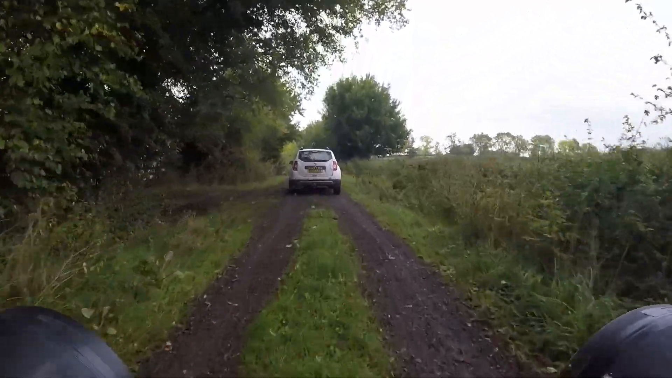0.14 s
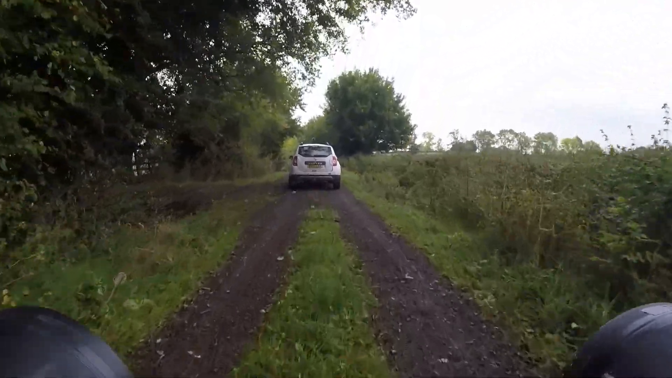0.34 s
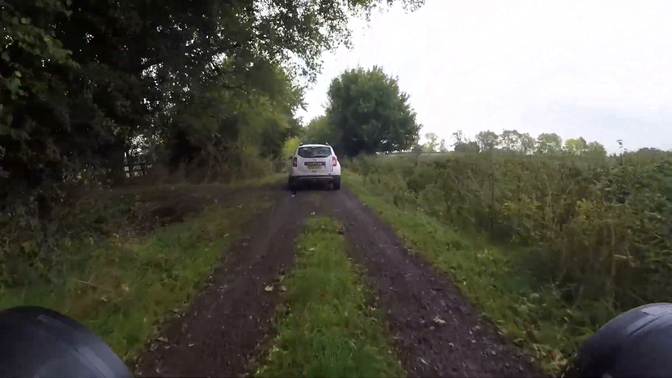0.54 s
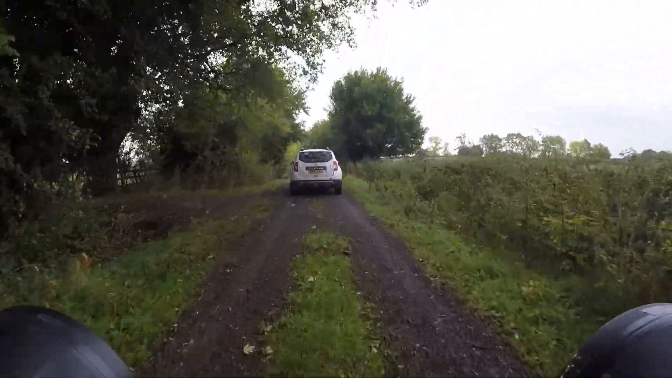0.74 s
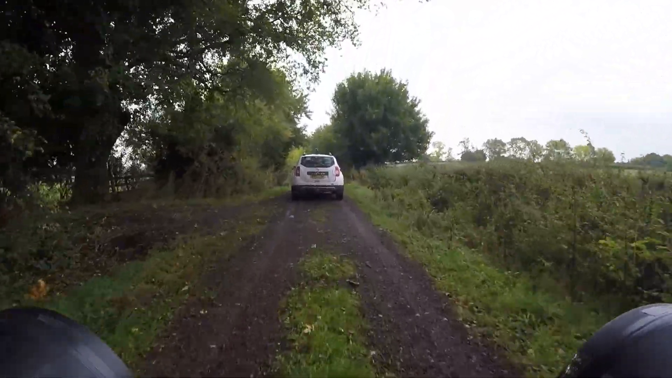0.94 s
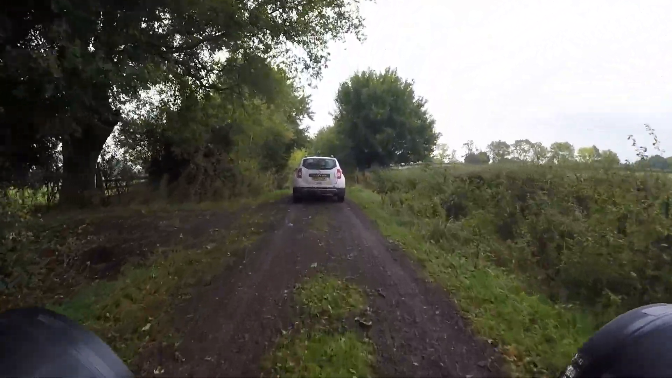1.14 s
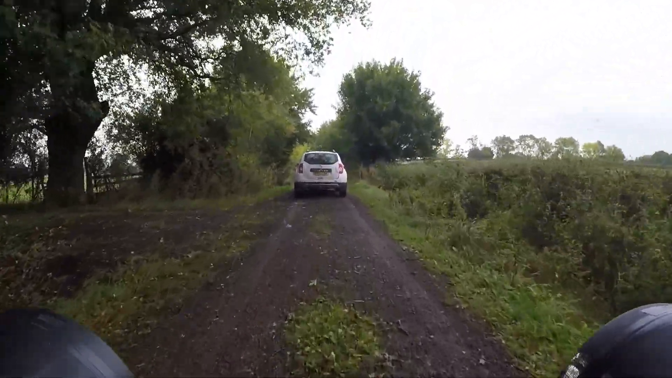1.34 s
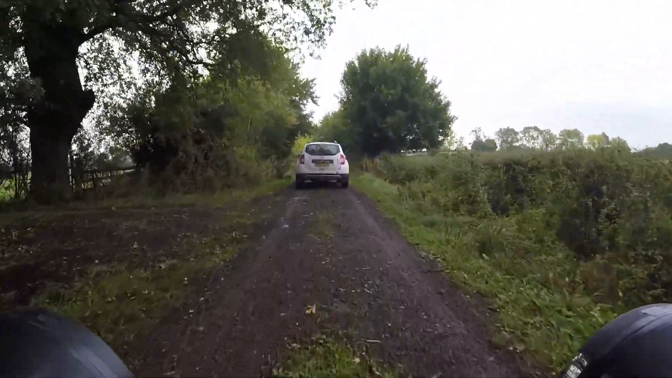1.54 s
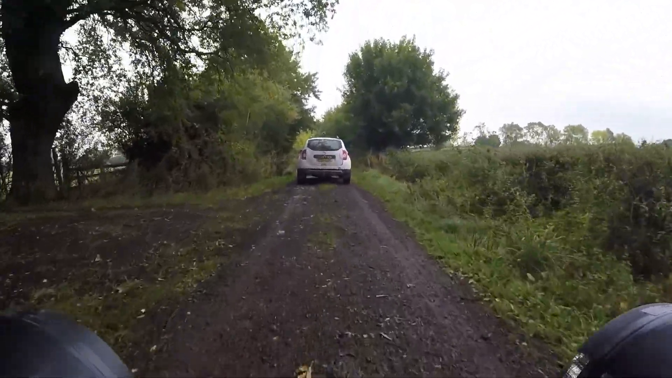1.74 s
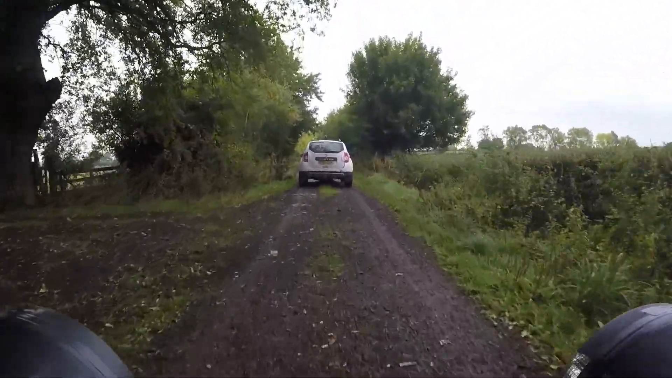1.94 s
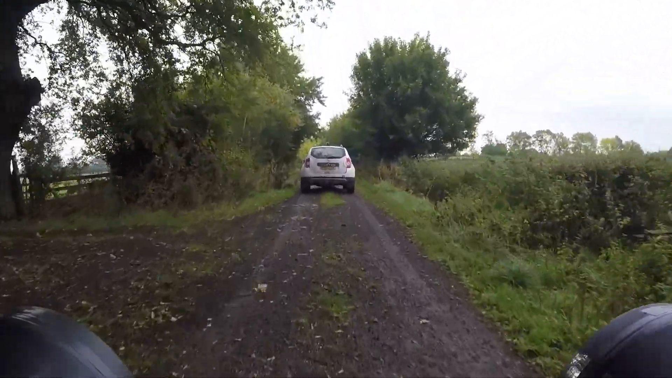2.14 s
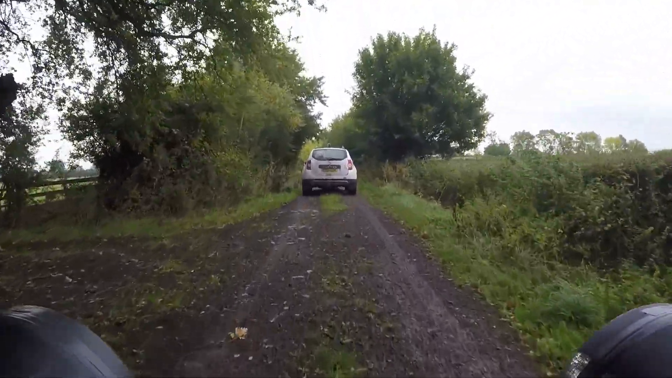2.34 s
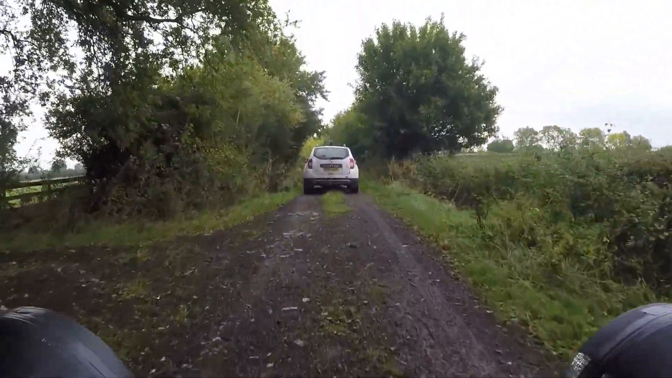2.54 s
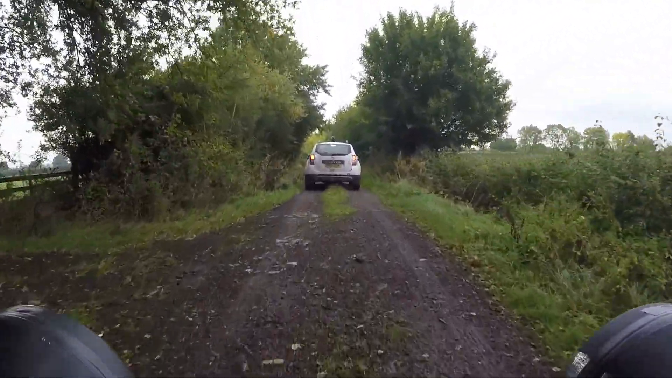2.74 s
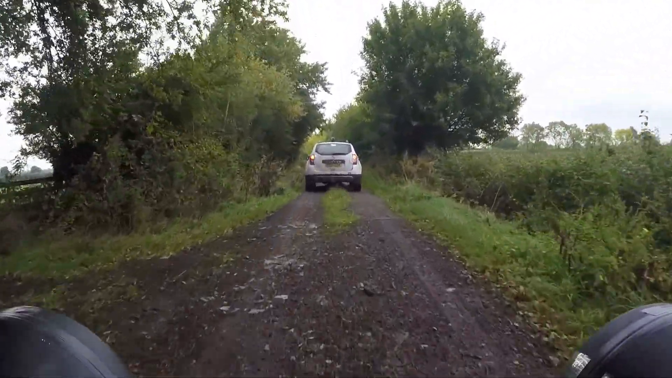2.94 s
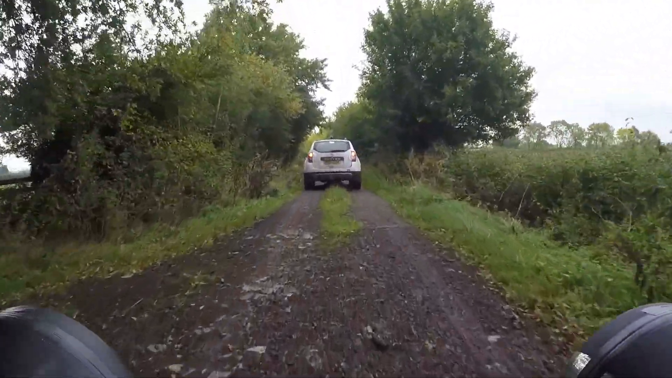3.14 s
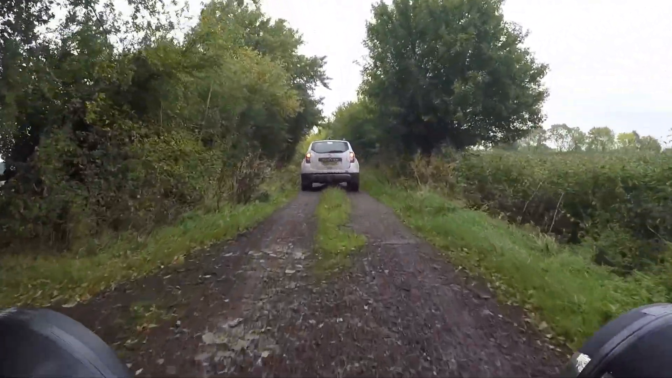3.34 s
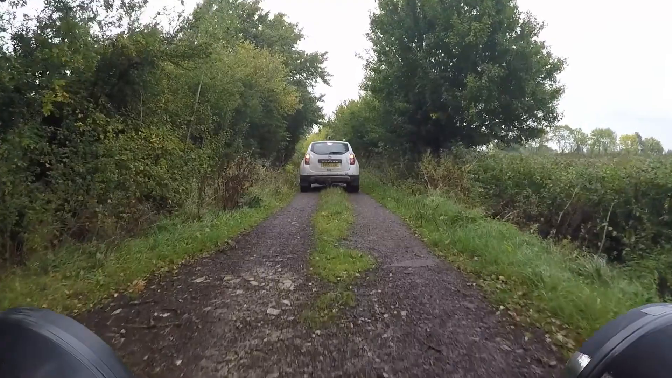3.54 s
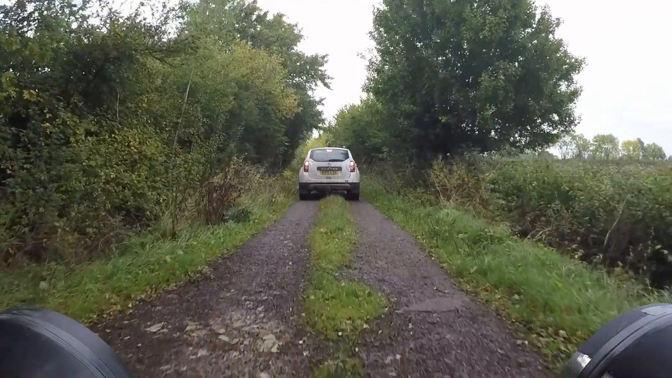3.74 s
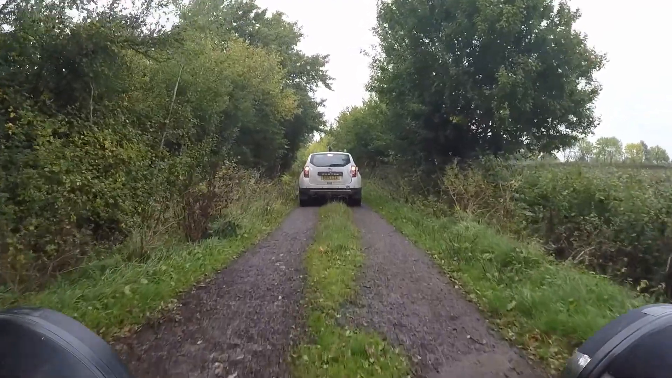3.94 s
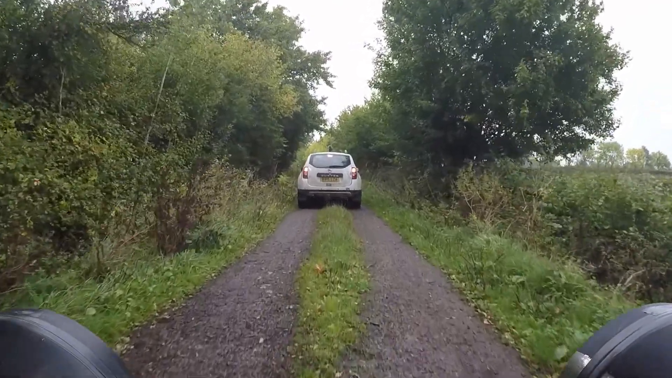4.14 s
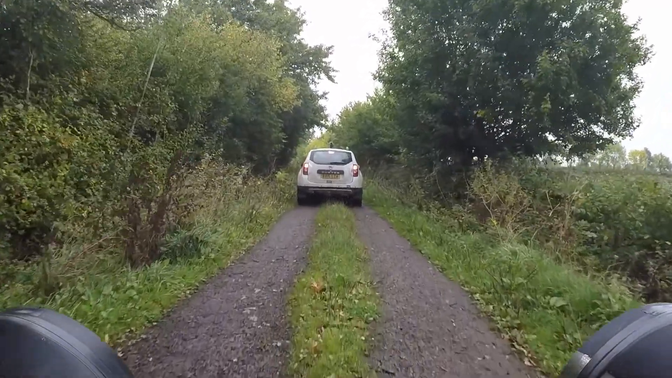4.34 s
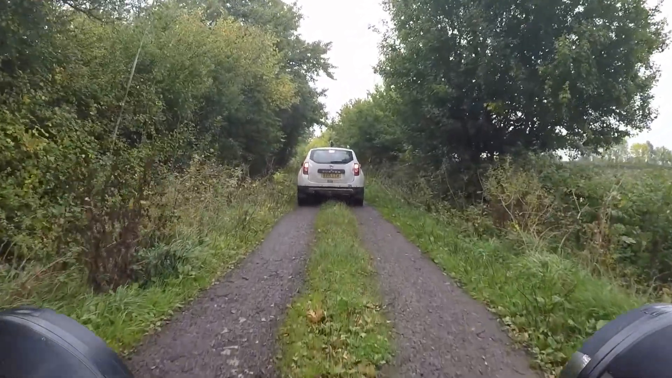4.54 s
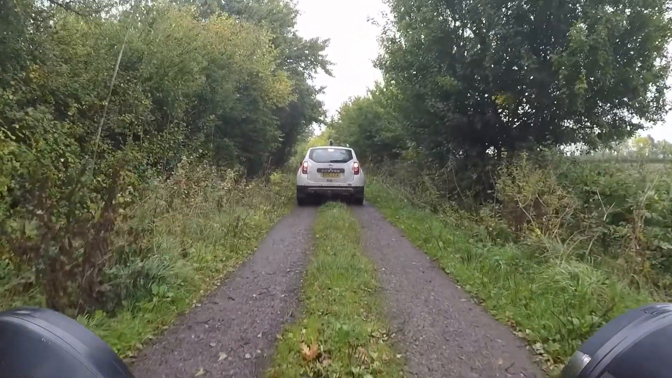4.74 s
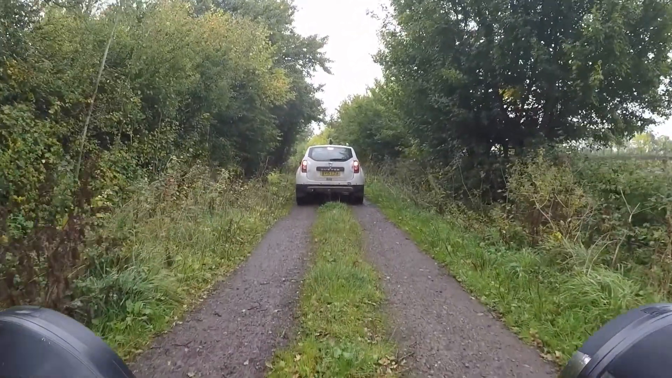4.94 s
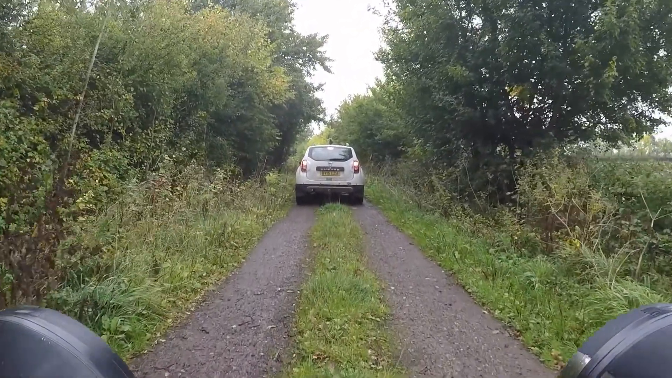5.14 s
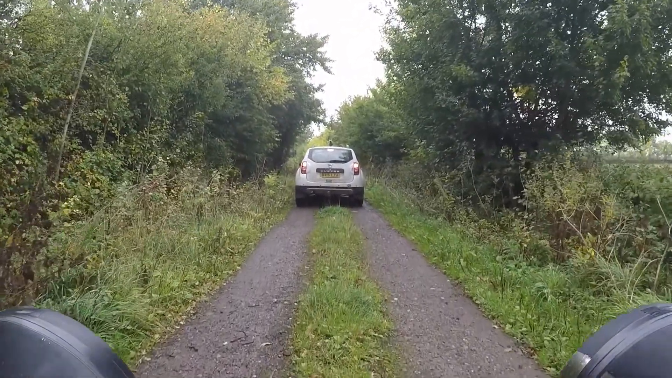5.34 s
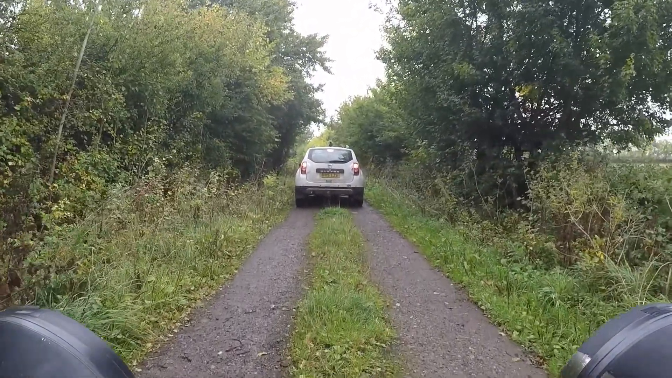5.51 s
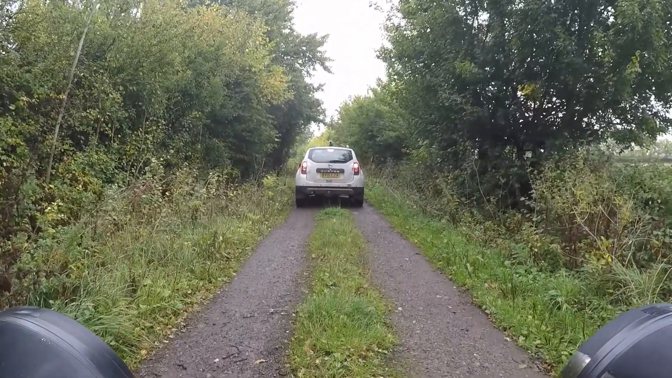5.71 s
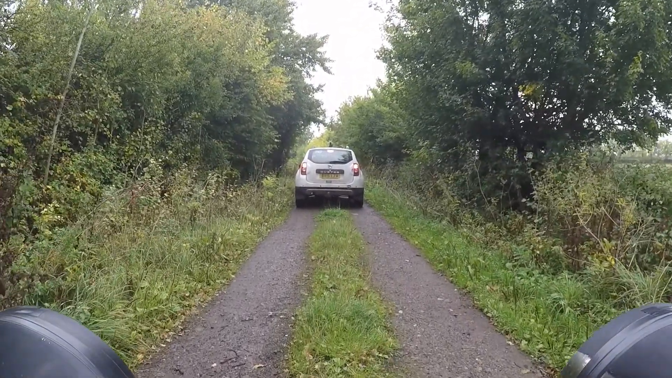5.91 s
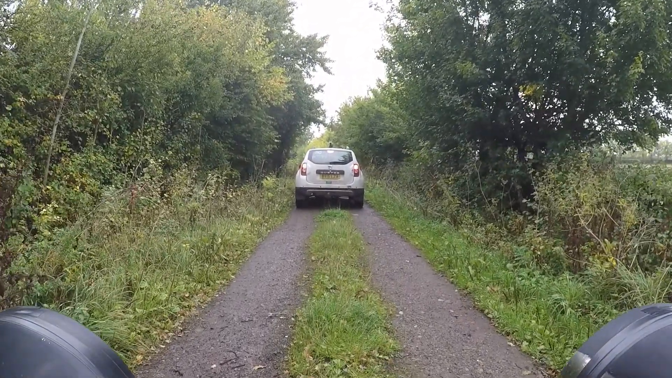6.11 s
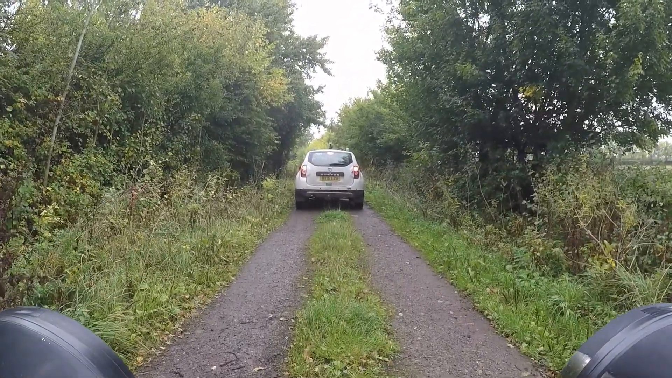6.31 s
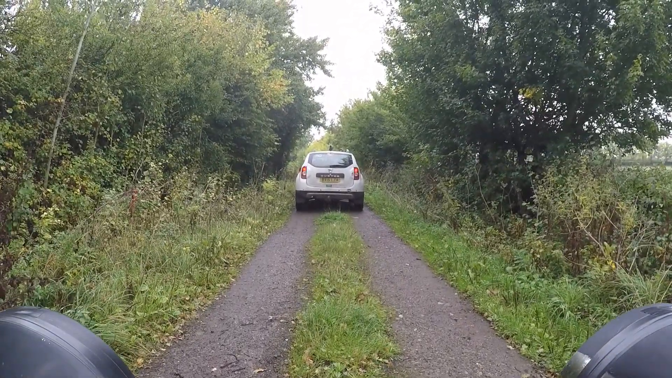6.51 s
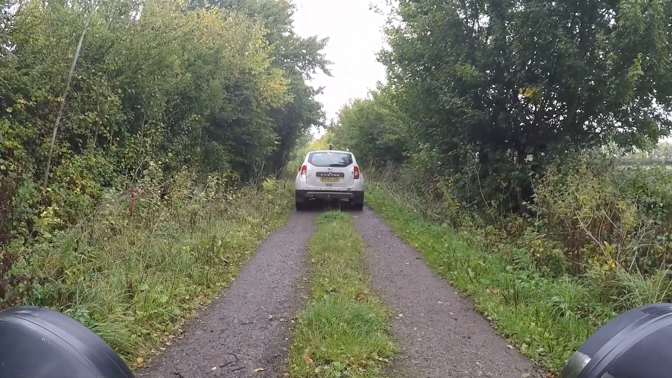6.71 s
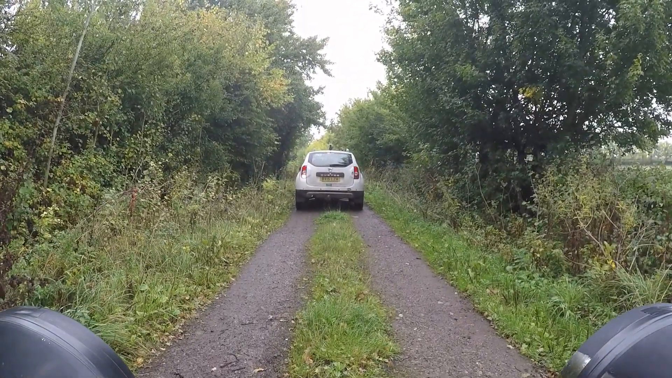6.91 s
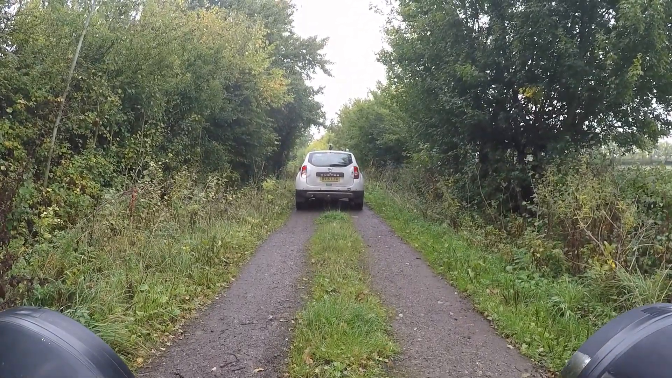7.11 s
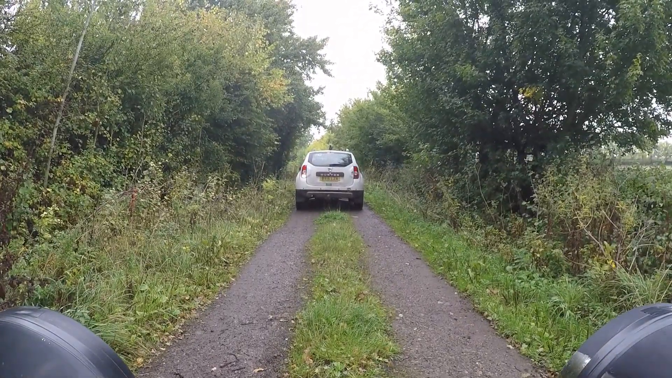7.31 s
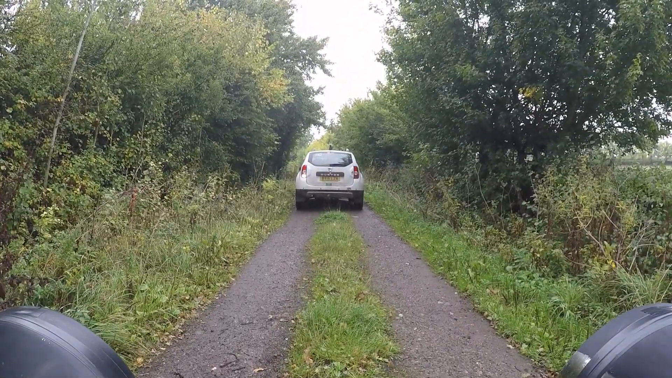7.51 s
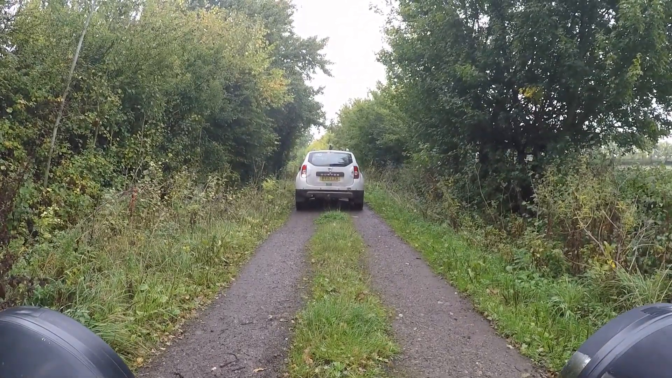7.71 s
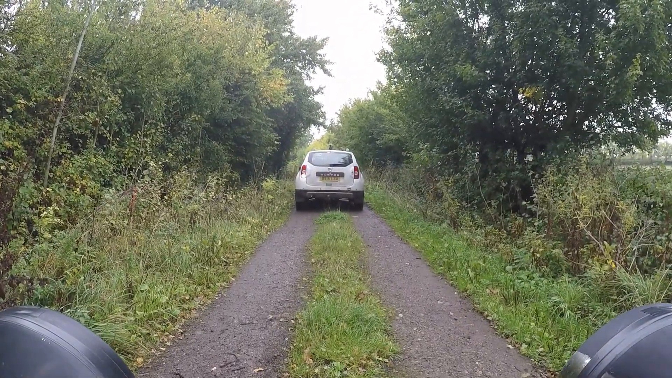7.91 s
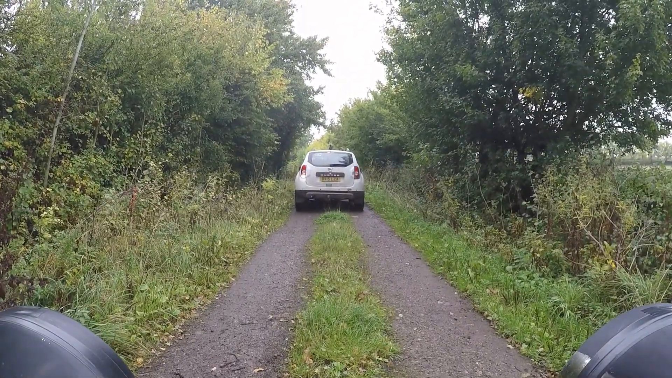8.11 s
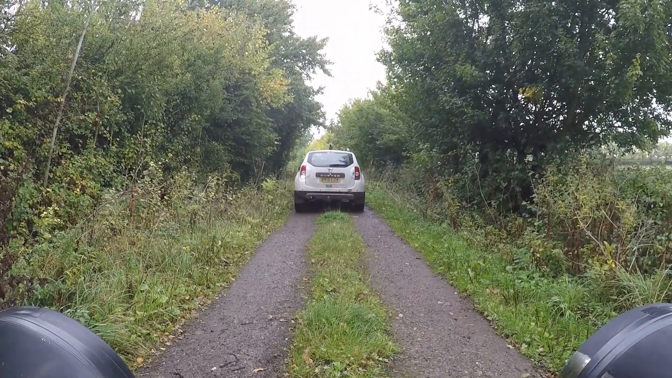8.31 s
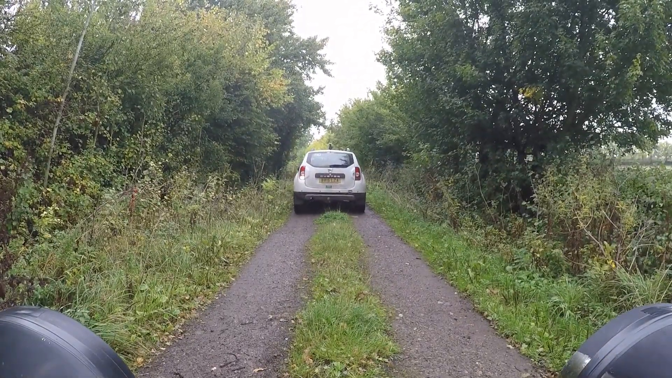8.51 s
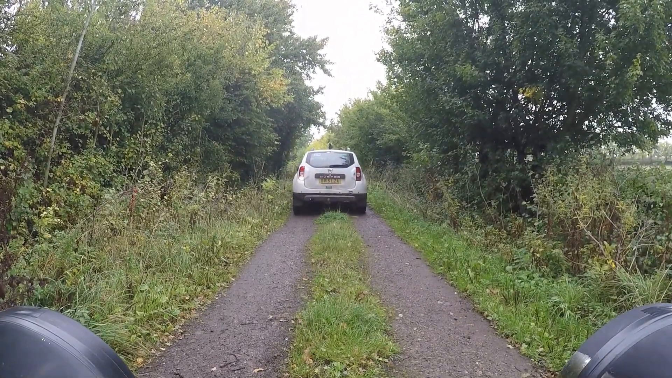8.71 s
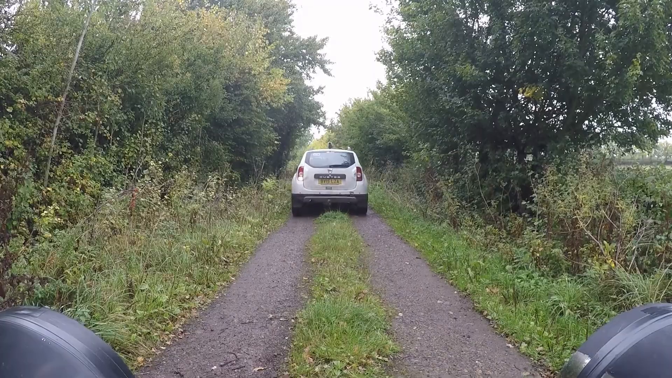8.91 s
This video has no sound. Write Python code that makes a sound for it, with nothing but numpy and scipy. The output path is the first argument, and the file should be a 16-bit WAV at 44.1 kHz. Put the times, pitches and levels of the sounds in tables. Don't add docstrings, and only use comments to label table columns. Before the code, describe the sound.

A diesel off-roader creeps along a stony track, deep booming thuds and crunching gravel easing into a clattering engine idle, with faint high brake squeals.

```python
import sys
import numpy as np
from scipy import signal
from scipy.fft import rfft, irfft, next_fast_len
from scipy.io import wavfile
from scipy.ndimage import uniform_filter1d, map_coordinates

SR = 44100
rng = np.random.default_rng(int(sys.argv[2]) if len(sys.argv) > 2 else 0)


def master_out(mix):
    frames = np.transpose(np.atleast_2d(mix))
    ceiling = np.clip(frames, -1, 1)
    pcm = np.round(ceiling * 32767).astype(np.int16)
    wavfile.write(sys.argv[1], SR, pcm)


def amplitude_ratio(level_db):
    exponent = np.asarray(level_db, float) / 20
    return 10 ** exponent


N = 395136

# (time [s], rate [Hz])
FIRING = [(0.0, 26.7), (1.0, 26.8), (2.3, 27.6), (3.3, 27.0), (4.0, 27.6), (4.6, 28.5), (5.2, 29.08),
          (5.6, 28.92), (5.9, 28.46), (6.3, 27.62), (6.7, 26.98), (7.1, 26.15), (7.5, 25.51), (7.9, 25.8),
          (8.3, 26.34), (8.96, 26.99)]
# (multiple of the firing rate, level [dB])
ENGINE_ORDERS = [(2, -53), (3, -58), (4, -53.5), (5, -55.5), (6, -56), (7, -56), (8, -57), (10, -58),
                 (11, -62), (12, -58.5), (14, -67)]
# (time [s], roar level [dB], engine's share against loose stones [0-1])
ROAD = [(0, -37, 0.27), (.5, -40.5, 0.22), (1.1, -39, 0.3), (1.55, -36.5, 0.29), (1.9, -40.5, 0.15),
        (2.3, -36.5, 0.26), (2.75, -38.5, 0.17), (3.15, -38.5, 0.27), (3.6, -37, 0.25), (4.1, -38.5, .3),
        (4.5, -39.5, 0.49), (5.2, -39.5, 0.73), (6.6, -40, 0.82), (7.7, -40.5, 0.78), (8.65, -40.5, 0.84),
        (8.78, -39.5, 0.5), (8.9, -34.5, 0.36), (8.96, -36.5, 0.04)]
# (start [s], loudest [s], end [s], level [dB])
SQUEALS = [
    (3.19, 3.24, 3.35, -72),
    (3.66, 3.86, 3.99, -66.5),
    (4.08, 4.13, 4.33, -73),
    (4.44, 4.56, 4.93, -63.5),
    (4.9, 4.97, 5.82, -66),
]
# (time [s], width [Hz])
SQUEAL_WIDTH = [(3.1, 520), (4.3, 440), (4.6, 170), (5.2, 100), (5.8, 50)]
# (pitch [Hz], level [dB])
WHINE = [(8629, -88)]
# (time [s], peak level [dB], ring [Hz])
STONES = [(0.6843, -32, 1900), (0.7492, -33, 1820), (0.7824, -28, 1960), (.9647, -40, 1865),
          (1.4177, -34, 1870), (1.6878, -26.5, 1920), (1.9874, -42, 1837), (3.73, -32, 1882),
          (4.448, -40, 1540), (4.7696, -43, 1866), (4.913, -37, 1503), (5.1515, -39, 1800),
          (6.2322, -41, 1891), (6.6692, -40, 1880), (7.435, -42, 1840), (8.2072, -37, 1920),
          (8.3955, -36, 1892), (8.4118, -30, 1946), (8.7779, -40, 1916), (8.8867, -37, 1903),
          (8.906, -39, 1900)]
# (time [s], swish [dB], case roar [dB], thud [dB], time to fall 60 dB [s])
TWIGS = [(7.681, -75, -59, -47, 0.24), (7.82, -75, -46, -41.5, .2), (8.202, -47, -37.5, -70, 0.13),
         (8.394, -59, -42, -50, .12), (8.408, -57, -35, -36, 0.11), (8.433, -68, -36, -41, 0.06),
         (8.455, -73, -46, -50, 0.16), (8.519, -54, -43, -38, 0.096), (8.84, -70, -54, -44, 0.14),
         (8.9, -56, -38, -44, 0.14), (8.915, -64, -41, -54, 0.09), (8.93, -60, -37, -40, .15)]

# (frequency [Hz], level [dB])
RUMBLE = [(28, -19), (48, -7), (57, -3), (70, -27.5), (85, -25), (110, -64), (190, -120)]
# (frequency [Hz], level [dB])
SWAY = [(6, -37), (12, -26), (20, -4.5), (24, -4.5), (30, -65)]
# (frequency [Hz], level [dB])
DRUMMING = [(47, -41), (80, -0.5), (108, 0.5), (129, -6.5), (161, -7.5), (190, -30), (250, -48),
            (420, -120)]
# (frequency [Hz], level [dB])
CASE = [(220, -35), (380, -23), (404, -15.5), (602, -14), (659, -14), (700, -13.5), (838, -7), (911, 2),
        (1170, -9), (1310, -6), (1650, -11), (1910, -1), (2180, -22.5), (2300, -19), (2990, -43.5),
        (5060, -120)]
# (frequency [Hz], level [dB])
GRIT = [(1240, -33.5), (2100, -4), (2190, -6), (2440, -1.5), (2710, -9.5), (3060, -6.5), (3310, -6.5),
        (3730, -8), (4460, -8), (5110, -22), (6060, -13.5), (8200, -35.5), (10700, -52), (18000, -120)]
# (frequency [Hz], level [dB])
SPRAY = [(4410, -16.5), (7500, -3.5), (9000, -6.5), (10500, -6.5), (11400, -9.5), (14200, -10.5),
         (15300, -14)]
# (frequency [Hz], level [dB])
BRUSH = [(1500, -30), (3000, -10), (5200, -10), (6500, 0), (7500, -4), (9500, -17), (11000, -23),
         (15000, -45)]
# (frequency [Hz], level [dB])
THUD = [(50, -21), (90, -10), (150, 13), (250, -5.5), (500, -29), (900, -49)]
# (frequency [Hz], level [dB])
COARSE = [(1900, -42), (2150, 2), (2400, 4), (2700, -17), (3300, -25), (4500, -60)]
# (frequency [Hz], level [dB])
BLOCK = [(220, -49.5), (380, -22.5), (584, -18.5), (639, -7), (694, -20.5), (766, -3.5), (838, -15.5),
         (911, 4), (1070, -8.5), (1370, -7.5), (1430, -13.5), (1880, -5), (2090, -21.5), (2300, -31),
         (2990, -57), (5060, -120)]
# (frequency [Hz], level [dB])
CLATTER = [(1240, -43.5), (2100, -19), (2160, -0.5), (2820, -4), (2960, -6), (3390, 0), (4020, -7),
           (4410, -5), (4770, -9.5), (5350, -13.5), (6240, -12.5), (8200, -26.5), (10700, -55),
           (18000, -120)]
# (frequency [Hz], level [dB])
EXHAUST = [(100, -28), (175, 1), (216, -3), (275, -5), (333, -3), (382, -11.5), (420, -4.5), (550, -30.5),
           (920, -120)]
# (frequency [Hz], gain [dB])
PANEL_GAIN = [(50, 0), (60, 0), (78, -8), (87, 0), (105, 2), (116, 1), (133, -9), (143, 3), (152, 0),
              (164, 2.5), (174, -11), (230, -9), (300, -11), (322, -2), (352, -3), (420, -10)]

# (centre [Hz], width [Hz], lift [dB])
TYRE_RINGS = [(881.4, 15, 7), (1915, 36, 1.5), (1167, 9.4, 10.5), (1267, 7.8, 9.5), (1538, 72, 4),
              (2002, 58, 2), (4770, 70, 4), (6830, 200, 7.5), (7310, 200, 9.5),
              (3060, 190, 6.5), (3740, 220, 6)]
# (centre [Hz], width [Hz], lift [dB])
BLOCK_RINGS = [(655, 8.8, 4.7), (795.3, 15, 10.9), (890, 14, 2.2), (1930, 110, 7.8), (1180, 34, 0.85),
               (1513, 175, 7), (2270, 52, 3.9), (6050, 130, 4.4), (6900, 240, 6.3)]
# (centre [Hz], width [Hz], lift [dB])
PANEL_RINGS = [(96, 5.5, 4), (122, 5, 2), (160, 13, 2), (195, 10, 4)]
# (centre [Hz], width [Hz], lift [dB])
THUD_RINGS = [(95, 25, 6.4), (194.7, 20.2, 2.36), (255, 24.4, 5.5)]

# (rut [s], boom left [dB], loudest [s], loudest level [dB], boom [Hz])
RUTS = [(0.0, -13, 0.079, -12.5, 33.2), (0.111, -19, 0.18, -9, 34.6), (0.358, -35, 0.51, -10.5, 34.13),
        (0.66, -31, 0.77, -9.5, 31.17), (0.878, -21, 0.967, -11.5, 33.8), (1.041, -19, 1.077, -12, 36.6),
        (1.111, -16, 1.141, -12, 35.7), (1.181, -21, 1.273, -11, 33.65), (1.358, -20.5, 1.46, -10.5, 34.7),
        (1.501, -20, 1.57, -9.5, 34.3), (1.626, -15, 1.64, -8.5, 33.4), (1.764, -23, 1.75, -12.5, 33.8),
        (1.864, -31, 1.98, -13, 35.3), (2.009, -10.5, 2, -12, 35.2), (2.1, -37, 2.17, -12.5, 32.76),
        (2.202, -24.5, 2.32, -9.5, 31.9), (2.338, -17.5, 2.39, -12, 32.4), (2.433, -14.5, 2.53, -8.5, 33.4),
        (2.553, -16, 2.58, -11.5, 33.4), (2.676, -14, 2.75, -9, 33), (2.841, -16, 2.94, -11.5, 33.8),
        (2.964, -22, 3.13, -11, 32.14), (3.073, -22, 3.11, -9.5, 33.55), (3.247, -32, 3.28, -15, 36.77),
        (3.324, -15.5, 3.35, -12.5, 38.9), (3.383, -16, 3.4, -10, 37.17), (3.51, -33.5, 3.55, -9, 35.4),
        (3.728, -30, 3.773, -14, 33.5), (3.822, -38, 3.88, -10.5, 34.35), (3.986, -17, 4.06, -11.5, 35.1),
        (4.063, -12.5, 4.14, -11.5, 33.56), (4.147, -11, 4.1, -11, 33.15),
        (4.404, -21.5, 4.497, -11, 33.03), (4.535, -11.5, 4.58, -11.5, 32.8),
        (4.628, -12.5, 4.67, -11, 33.26), (4.778, -11.5, 4.855, -12, 31.97)]
# (rut [s], boom left [dB], loudest [s], loudest level [dB], boom [Hz])
LAST_RUTS = [
    (5.082, -23.5, 5.218, -16.5, 30.4),
    (5.351, -25, 5.413, -18, 30.14),
]
# (rut [s], boom left [dB], loudest [s], loudest level [dB], boom [Hz])
VERGE_RUTS = [(8.29, -45, 8.2, -19, 31.32), (8.41, -26.5, 8.44, -21, 31.5), (8.478, -45, 8.535, -17, 32.5),
              (8.578, -33, 8.612, -19.5, 30.3), (8.655, -37, 8.744, -17, 30.3),
              (8.787, -19.5, 8.887, -13.5, 35.1), (8.927, -31, 8.9, -22, 36.4)]
# (time [s], rocking [dB], bonnet hum [dB])
BEATS = [(5.463, -21.5, -24.5), (5.676, -24.5, -21), (5.871, -23.5, -20), (6.063, -21, -23.5),
         (6.274, -30, -21), (6.497, -24.5, -27.5), (6.692, -23.5, -28.5), (6.846, -25.5, -26.5),
         (7.0, -24.5, -31.5), (7.145, -24.5, -34.5), (7.304, -26, -34), (7.447, -27.5, -34),
         (7.592, -26, -38), (7.764, -26, -35), (7.937, -24.5, -30.5), (8.052, -24.5, -29.5),
         (8.175, -24.5, -29), (8.29, -24.5, -28)]
# (middle [s], strength [dB], length [s])
POTHOLES = [(0, 17, 0.34), (0.654, 1.5, .3), (1.275, 10, 0.75), (1.95, -3, 0.27), (2.327, 8.5, 0.67),
            (3.104, 2, 0.31), (3.575, 14, 0.37), (3.84, 14, 0.3), (4.597, 5, 0.72), (7.858, 11, 0.093),
            (8.432, 21, .2), (8.96, 10.5, 0.43), (3.35, 9, 0.19), (5.347, 9, 0.52), (5.704, 7, 0.37)]
# (level on smooth ground [dB], added by loose stones [dB], share of a jolt followed [0-1])
RUMBLE_LAW = (-58.5, 11.5, 0.62)
# (level on smooth ground [dB], added by loose stones [dB], share of a jolt followed [0-1])
DRUMMING_LAW = (-56.5, 14.7, 0.4)
# (level on smooth ground [dB], added by loose stones [dB], share of a jolt followed [0-1])
SWAY_LAW = (-67.5, 40.5, 0.54)
# (middle [s], length [s], level [dB], note [Hz])
PANEL_HUMS = [(0.028, 0.12, -58, 279), (0.04, 0.14, -63.0, 239.0), (0.05, 0.18, -47.5, 148.4),
              (0.06, 0.17, -47, 70.0), (0.08, 0.2, -48, 94.4), (0.43, 0.19, -50, 141.0),
              (0.52, 0.31, -48, 69.0), (1.26, 0.22, -45, 100.6), (1.44, 0.21, -50.0, 81.2),
              (1.6, 0.26, -51, 68.1), (2.101, 0.19, -47.0, 102.3), (2.271, 0.51, -48.5, 122.1),
              (2.28, 0.19, -46.0, 99.0), (2.33, 0.87, -41, 57.0), (2.34, 1.1, -42, 56.8),
              (2.39, 0.19, -48.0, 79.0), (2.56, 1.3, -54.5, 120.6), (2.639, 0.15, -50.0, 116.0),
              (3.3, 0.27, -47.0, 99.0), (3.32, 0.21, -49, 119.3), (3.48, 0.17, -53, 116.3),
              (3.68, 0.3, -53.0, 154.0), (3.732, 0.51, -45.5, 97.85), (3.75, 0.5, -40, 98.0),
              (3.94, 0.25, -38.0, 57.0), (4.37, 0.31, -45.5, 101.5), (4.621, 0.25, -41, 56.55),
              (4.658, 0.2, -48, 96.6), (6.748, 0.23, -55, 163.9), (7.785, 0.4, -59.5, 195.0),
              (8.439, 0.17, -63, 278.8), (8.45, 0.16, -43, 72.3), (8.45, 0.19, -46, 163.5),
              (8.478, 0.19, -44, 99.7), (8.48, 0.2, -61, 195.0), (8.5, 0.21, -50, 130),
              (8.86, 0.14, -46.5, 99.4), (8.88, 0.21, -55, 195.0), (8.9, 0.17, -52.5, 255.0),
              (8.921, 0.12, -59.0, 217.0),
              (1.28, 0.32, -42, 56), (5.22, 0.26, -49, 109), (5.45, 0.44, -55, 88)]


def unit(x):
    return x / np.sqrt(np.mean(x ** 2) + 1e-20)


def curves(rows):
    s, *columns = np.transpose(rows)
    return [np.interp(np.arange(N) / SR, s, column) for column in columns]


def wobble(rate):
    coarse = np.arange(0, N + 32, 32)
    knots = rng.standard_normal(int(N * rate / SR) + 4)
    return np.interp(np.arange(N), coarse, map_coordinates(knots, [coarse * rate / SR]))


def turns(hz):
    return 2 * np.pi * np.cumsum(hz) / SR


def swell(start_s, length_s, power):
    x = np.zeros(N + 2 * SR)
    first = round(start_s * SR) + SR
    n = max(round(length_s * SR), 2)
    x[first:first + n] = np.sin(np.pi * np.arange(n) / n)[:len(x) - first] ** power
    return x[SR:SR + N]


def coloured(x, spectrum, rings=()):
    m = next_fast_len(N + 8192)
    f = np.fft.rfftfreq(m, 1 / SR)
    hz, db = np.transpose(spectrum)
    colour_db = np.interp(np.log(f + 1), np.log(hz + 1), db, -120, -120)
    for centre, width, lift_db in rings:
        colour_db = colour_db + lift_db / (1 + (2 * (f - centre) / width) ** 2)
    return unit(irfft(rfft(x, m) * amplitude_ratio(colour_db), m)[:N])


def rush(patchy_db, grit_db=-40, per_s=700):
    z = signal.stft(rng.standard_normal(N), nperseg=512)[2]
    patches = uniform_filter1d(rng.standard_normal(z.shape), size=6, axis=0)
    patches = uniform_filter1d(patches, size=10, axis=1)
    hiss = signal.istft(z * amplitude_ratio(patchy_db * unit(patches)), nperseg=512)[1][:N]
    cracks = (rng.random(N) < per_s / SR) * np.clip(rng.standard_normal(N), -2, 2)
    return unit(hiss) + amplitude_ratio(grit_db) * unit(cracks)


def electric_whine():
    x = np.zeros(N)
    for hz, db in WHINE:
        tone = np.sin(turns(hz + 3 * wobble(14)))
        x += np.sqrt(2) * amplitude_ratio(db + 1.4 * wobble(6)) * tone
    return x


def twigs():
    leaves = rush(1.5, grit_db=-3)
    layers = [coloured(leaves, shape) for shape in (BRUSH, GRIT, CASE)]
    layers = np.array(layers + [coloured(leaves, THUD, THUD_RINGS)])
    fade_db = np.array([[110], [80], [60], [60]])
    x = np.zeros(N)
    for s, swish_db, roar_db, thud_db, t60 in TWIGS:
        scrape_db = .72 * swish_db + .28 * roar_db - 1
        levels_db = [swish_db, scrape_db, roar_db, thud_db]
        span = slice(round(s * SR), round((s + t60) * SR))
        t = np.arange(len(x[span])) / SR / t60
        stroke = amplitude_ratio(levels_db) @ (amplitude_ratio(8 - fade_db * t) * layers[:, span])
        x[span] += (1 - np.exp(-14 * t)) * stroke
    return x


def stones():
    crack_t60_s, ring_lag_s, ring_t60_s, ring_db = .009, .005, .025, 1
    low_hz, high_hz, tilt_db = 1700, 3700, -4
    x = np.zeros(N + SR)
    t = np.arange(2000) / SR
    late = np.maximum(t - ring_lag_s, 0)
    for s, db, hz in STONES:
        crack = np.zeros(len(t))
        for c in np.linspace(low_hz, high_hz, 9) + rng.normal(0, 70, 9):
            crack += amplitude_ratio(tilt_db * (c - low_hz) / 2000) * np.sin(2 * np.pi * c * t)
        crack *= .75 * amplitude_ratio(-60 * t / crack_t60_s)
        ring = 1.6 * (1 - np.exp(-late / .0015)) * np.sin(2 * np.pi * hz * t)
        ring *= amplitude_ratio(ring_db - 60 * late / ring_t60_s)
        x[round(s * SR):][:len(t)] += amplitude_ratio(db) * ((1 - np.exp(-t / .0006)) * crack + ring)
    return x[:N]


def brake():
    squeal_hz, bite_db, ease_db, ease_power = 11345, 7, 10, 2.5
    t = np.arange(N) / SR
    knots = np.cumsum(curves(SQUEAL_WIDTH)[0]) / SR
    a, b = (map_coordinates(rng.standard_normal(int(knots[-1]) + 4), [knots]) for _ in range(2))
    tone = a * np.sin(2 * np.pi * squeal_hz * t) + b * np.cos(2 * np.pi * squeal_hz * t)
    x = np.zeros(N)
    for start, top, end, db in SQUEALS:
        off, = curves([(start, -1), (top, 0), (end, 1)])
        shape_db = np.where(off < 0, bite_db * off, -ease_db * abs(off) ** ease_power)
        x += (abs(off) < 1) * amplitude_ratio(db + shape_db + 2.0) * tone
    return x


def humming_panels():
    x = np.zeros(N)
    for s, long, db, hz in PANEL_HUMS:
        first = max(round((s - long / 2) * SR), 0)
        last = min(round((s + long / 2) * SR), N)
        i = np.arange(first, last)
        x[i] += 2 * amplitude_ratio(db) * np.cos(np.pi * (i / SR - s) / long) * np.sin(2 * np.pi * hz * i / SR)
    return x


def jolts_db():
    return sum(db * swell(s - long / 2, long, 0.87) for s, db, long in POTHOLES)


def springs_and_panels(ruts):
    loose = 1 - curves(ROAD)[1]
    jolt_db = jolts_db()

    def level(smooth_db, stones_db, follows):
        return amplitude_ratio(smooth_db + stones_db * loose + follows * jolt_db)

    rumble = level(*RUMBLE_LAW) * amplitude_ratio(7.5) * coloured(rng.standard_normal(N), RUMBLE)
    drumming = level(*DRUMMING_LAW) * coloured(rng.standard_normal(N), DRUMMING, PANEL_RINGS)
    sway = level(*SWAY_LAW) * coloured(rng.standard_normal(N), SWAY)
    return rumble + drumming + (.25 + ruts / amplitude_ratio(-16.5)) * sway


def verge(beat):
    grind = coloured(amplitude_ratio(2.5 * beat) * rush(1.5, grit_db=4, per_s=250), COARSE)
    return amplitude_ratio(-66 + 45 * (np.arange(N) / SR - 8.535)) * grind


def tyres(bumps):
    roar_db, share = curves(ROAD)
    loose = 1 - share
    crunch_db = roar_db - 17.5 + 6 * loose
    rings = TYRE_RINGS
    roar = coloured(amplitude_ratio(0.46 * bumps) * rush(0.31, grit_db=-8.0), CASE, rings)
    crunch = coloured(amplitude_ratio(0.48 * bumps) * rush(0.69, grit_db=-6.0), GRIT, rings)
    return np.sqrt(loose) * (amplitude_ratio(roar_db + 0.12) * roar + amplitude_ratio(crunch_db + 0.32) * crunch)


def spray(beat, bumps, ruts, boom_phase):
    roar_db, share = curves(ROAD)
    rattle_db = (ruts / amplitude_ratio(-8.5)) ** 2 * (5.5 + 3 * np.cos(2 * boom_phase))
    level_db = -75.5 + 0.3 * (roar_db + 41) + rattle_db
    grit = rush(2.2, grit_db=-6.5)
    return amplitude_ratio(level_db + 5.0) * coloured(amplitude_ratio(0.48 * share * beat + 0.63 * bumps) * grit, SPRAY)


def rut_knots(rows):
    knots = []
    for s, left_db, top, db, hz in rows:
        knots += [(s, amplitude_ratio(2 * left_db)), (top, amplitude_ratio(2 * db))]
    return knots


def bonnet():
    deep_db, flip_s = 12, .05
    quiet = [(BEATS[0][0], 0), (BEATS[-1][0] - flip_s, 0)]
    power, = curves(rut_knots(RUTS + LAST_RUTS) + quiet + rut_knots(VERGE_RUTS))
    every = RUTS + LAST_RUTS + VERGE_RUTS
    deep = [s for s, left_db, top, db, hz in every if db - left_db > deep_db]
    flip_knots = []
    for k, s in enumerate(deep):
        flip_knots += [(s - flip_s / 2, k), (s + flip_s / 2, k + 1)]
    flips, = curves(flip_knots)
    boom_hz, = curves([(top, hz) for s, left_db, top, db, hz in every])
    return np.sqrt(abs(uniform_filter1d(power, size=400))), turns(boom_hz) - np.pi * flips


def bonnet_boom(ruts, boom_phase):
    chassis_hz, wide_hz = 40.53, 4
    chassis = np.sin(turns(chassis_hz + wide_hz / 4 * wobble(3.52))) * wobble(wide_hz)
    chassis_gain = amplitude_ratio(-19 + 0.3 * jolts_db())
    return np.sqrt(2) * ruts * (np.sin(boom_phase) + chassis_gain * chassis)


def rocking_engine():
    phase = turns(curves(FIRING)[0])
    first, last = BEATS[0][0], BEATS[-1][0]
    smooth, = curves([(first - .015, 0), (first + .015, 1), (last - .015, 1), (last + .015, 0)])
    stony, = curves([(4.85, 1), (5, 0)])
    rock_db, hum_db = curves(BEATS)
    ahead, = curves([(row[0], k + .5) for k, row in enumerate(BEATS)])
    share = curves(ROAD)[1]
    early = stony * amplitude_ratio(-38.5 + 14.5 * share)
    rocking = (early + smooth * amplitude_ratio(rock_db)) * np.sin(phase)
    hum = smooth * amplitude_ratio(hum_db) * np.sin(phase + 2 * np.pi * ahead)
    return np.sqrt(2) * (rocking + hum)


def firing_beat():
    phase = turns(curves(FIRING)[0])
    return np.cos(phase + 0.77) + 0.2 * np.cos(2 * phase + 0.31) + 0.11 * np.cos(phase / 2 + 0.36)


def engine_hum():
    (hz,), (roar_db, share) = curves(FIRING), curves(ROAD)
    phase = turns(hz)
    x = np.zeros(N)
    for k, db in ENGINE_ORDERS:
        panel_db = np.interp(k * hz, *np.transpose(PANEL_GAIN))
        level_db = db + 5.5 + 14 * (share - 1) + panel_db + .7 * wobble(3.9)
        x += amplitude_ratio(level_db) * np.sin(k * phase + .55 * wobble(4.5))
    return x


def engine(beat):
    roar_db, share = curves(ROAD)
    clatter_db = roar_db - 17.5 + 6 * (1 - share)
    block = coloured(amplitude_ratio(2.37 * beat) * rush(0.66), BLOCK, BLOCK_RINGS)
    clatter = coloured(amplitude_ratio(2.0 * beat) * rush(1.0, grit_db=-10.5), CLATTER, BLOCK_RINGS)
    exhaust = coloured(amplitude_ratio(1.2 * share * beat) * rush(0.77), EXHAUST)
    x = np.sqrt(share) * (amplitude_ratio(roar_db + 0.12) * block + amplitude_ratio(clatter_db + 0.32) * clatter)
    return x + amplitude_ratio(roar_db - 16 - 3 * share) * exhaust


def scene():
    ruts, boom_phase = bonnet()
    beat = firing_beat()
    bumps = wobble(14)
    x = electric_whine() + twigs() + stones() + brake()
    x += humming_panels() + springs_and_panels(ruts)
    x += verge(beat) + tyres(bumps) + spray(beat, bumps, ruts, boom_phase)
    x += bonnet_boom(ruts, boom_phase) + rocking_engine()
    x += engine_hum() + engine(beat)
    return x[None]


def top_cut(x):
    return signal.sosfilt(signal.butter(12, 15470, fs=SR, output="sos"), x)


def record(dry):
    fade = np.minimum(np.arange(N, 0, -1) / 100, 1)
    return top_cut(dry * fade)


dry = scene()
out = record(dry)
master_out(out)
```